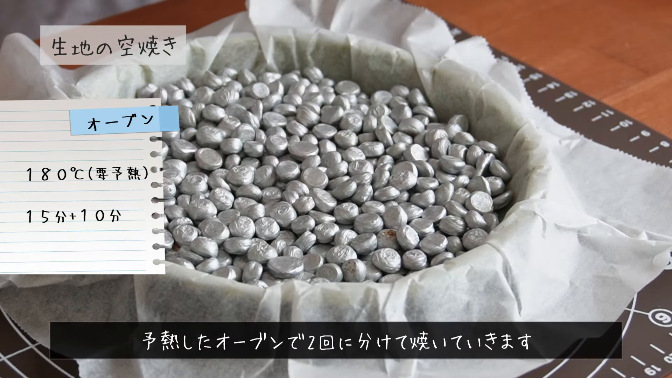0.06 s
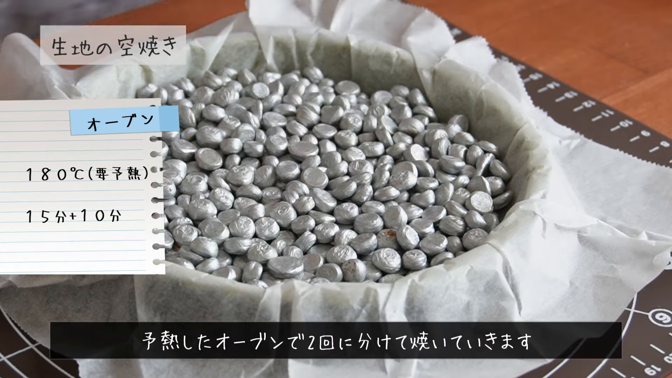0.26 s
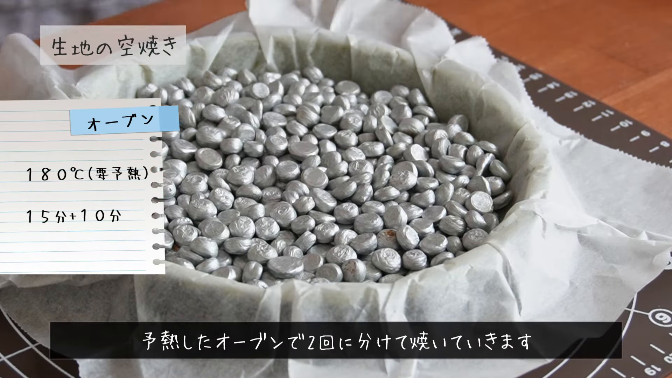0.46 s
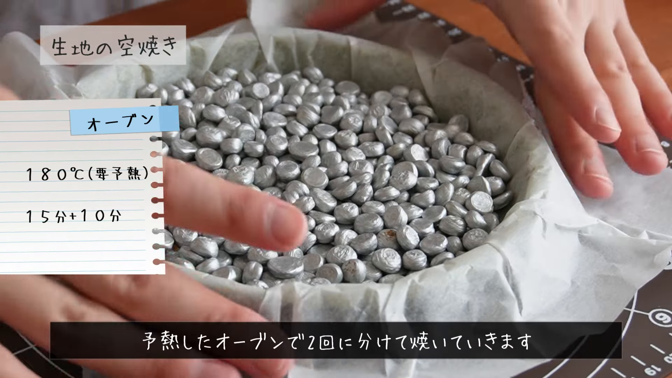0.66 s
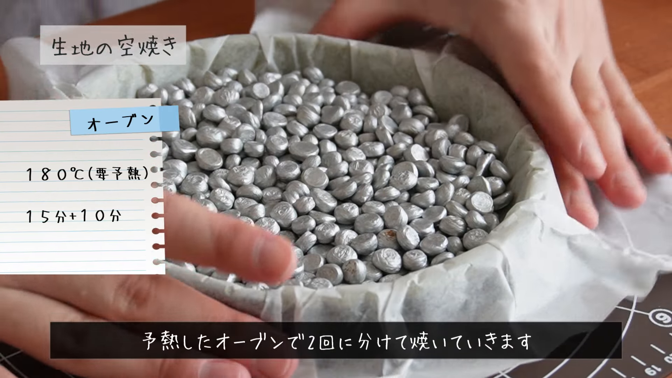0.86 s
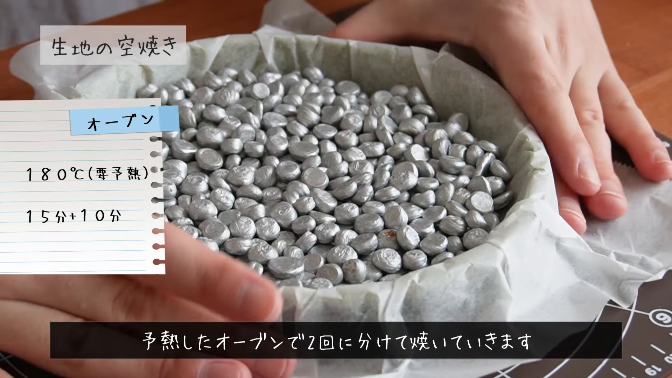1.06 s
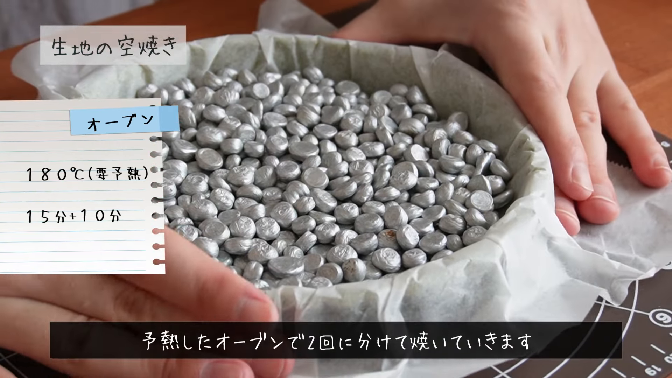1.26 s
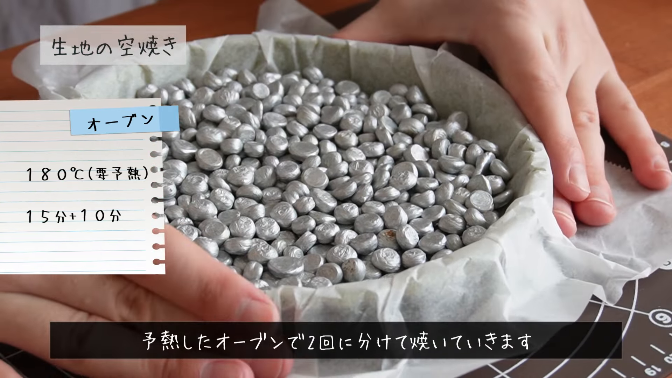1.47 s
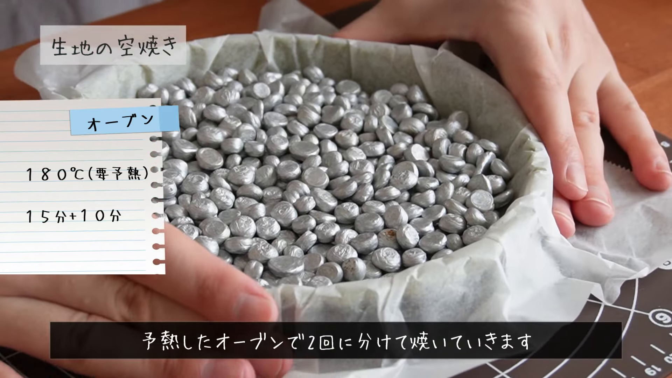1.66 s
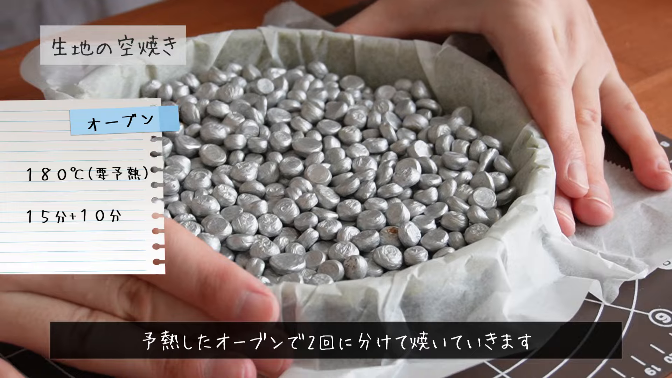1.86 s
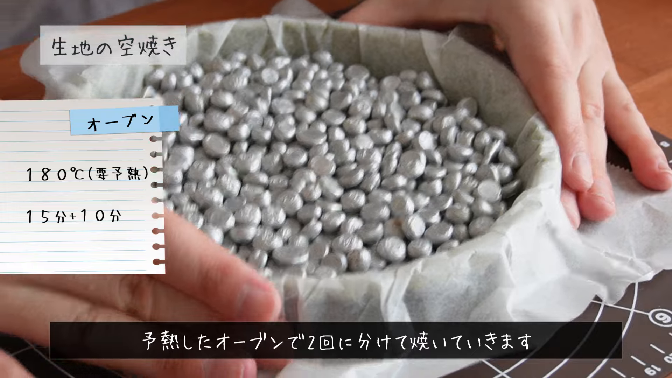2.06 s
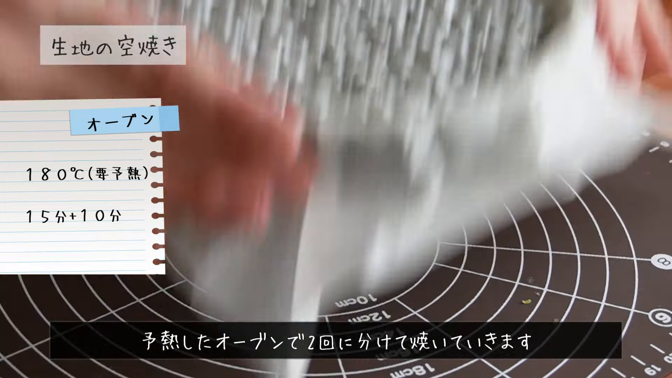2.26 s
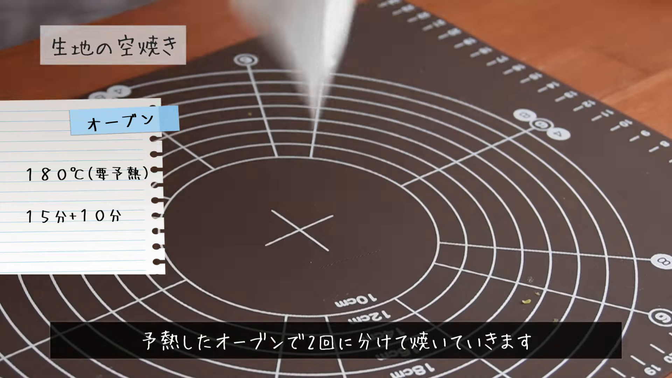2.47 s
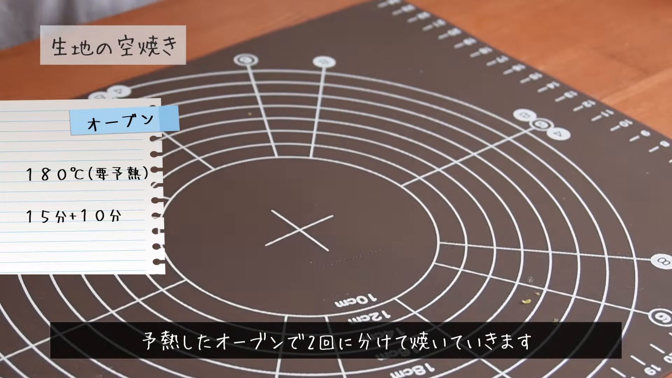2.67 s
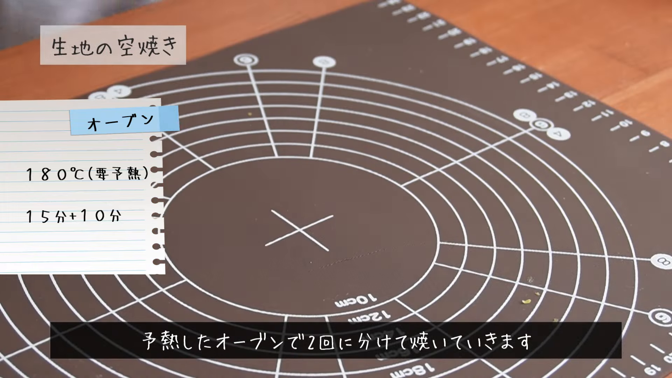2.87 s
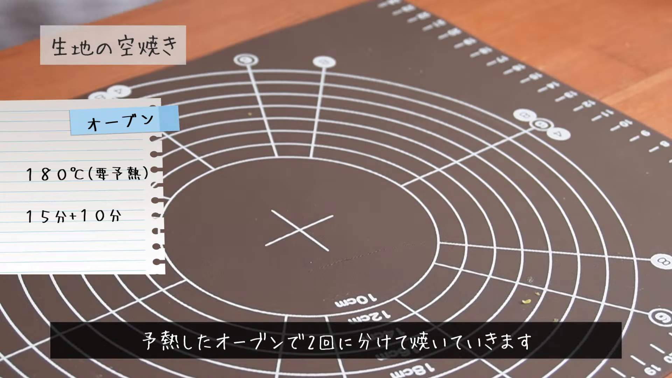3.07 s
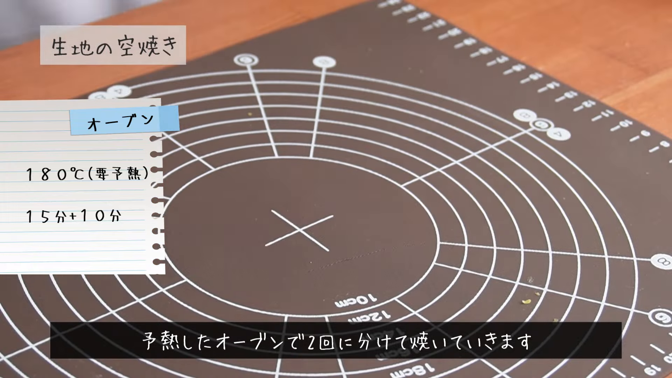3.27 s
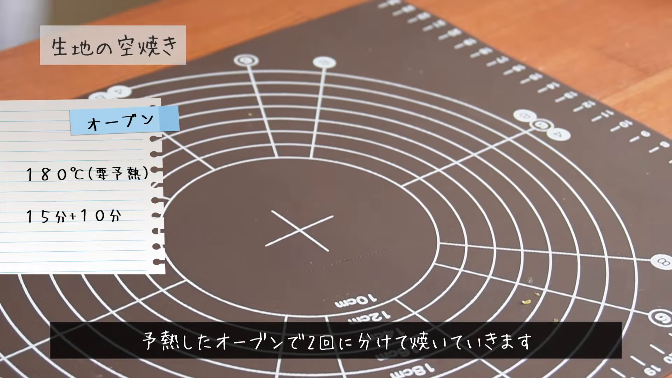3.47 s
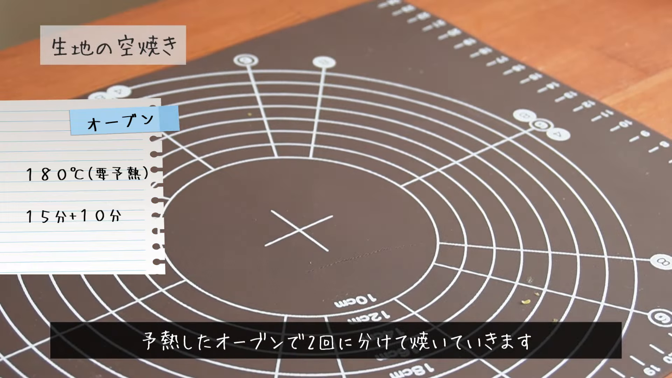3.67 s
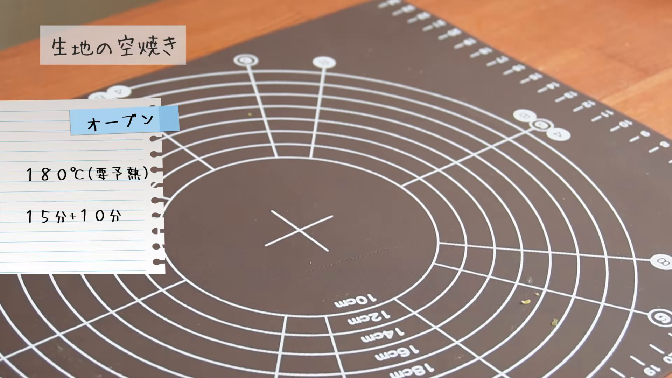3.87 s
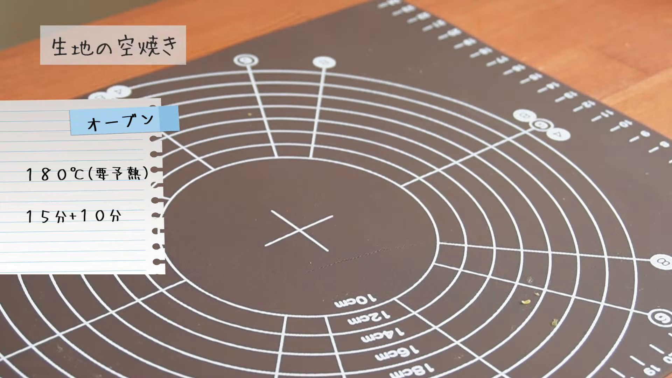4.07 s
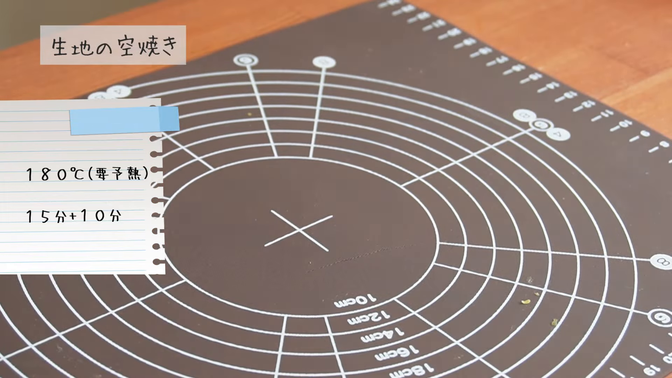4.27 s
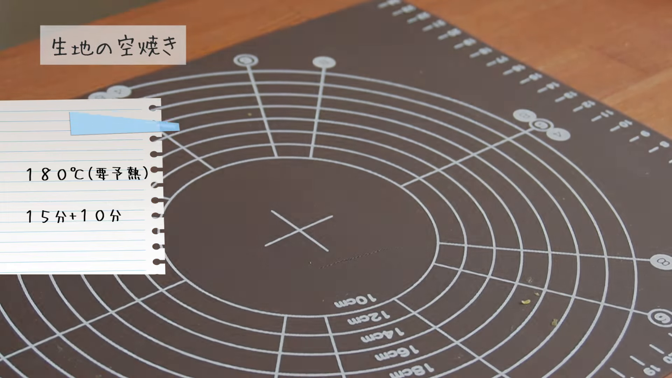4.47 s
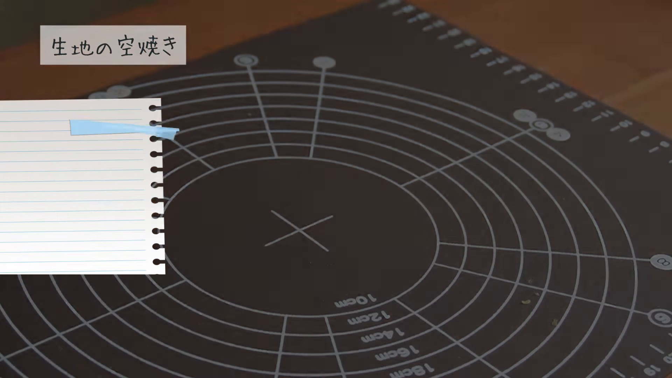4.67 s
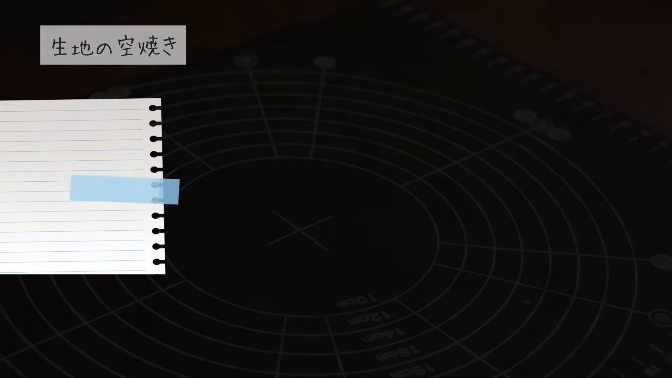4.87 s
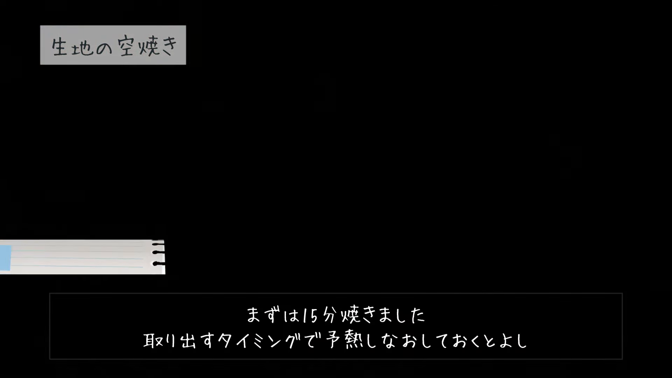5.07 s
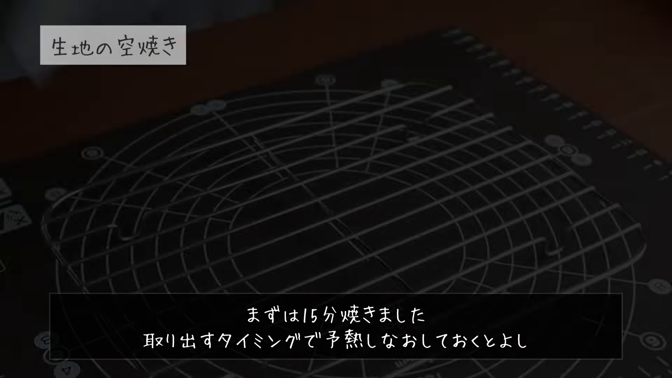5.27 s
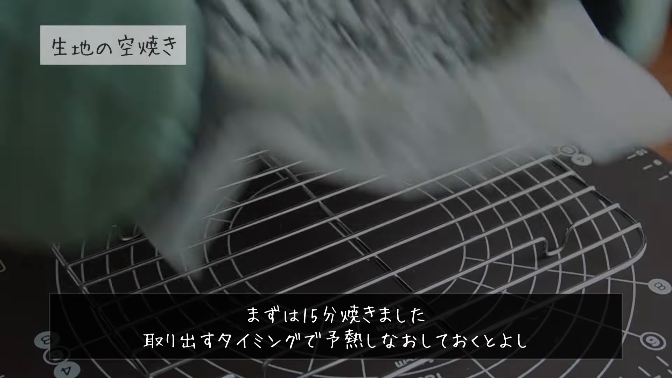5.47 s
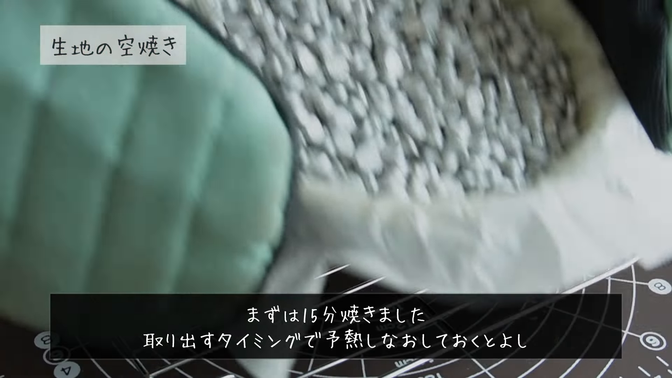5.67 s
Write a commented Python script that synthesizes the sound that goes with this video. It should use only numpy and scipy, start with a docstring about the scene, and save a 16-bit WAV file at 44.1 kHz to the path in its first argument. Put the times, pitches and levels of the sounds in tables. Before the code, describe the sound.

A close microphone catches dry paper snaps and grainy rustle over faint room hiss. The handling is busiest early, eases, then swells with short metallic tin knocks at lifting. A soft floor thud, brushing sleeves and scattered crackles move away into the small room. Near the end a low surging fan drone switches in with a few fresh paper ticks.

```python
"""A quiet kitchen, close by: hands lift a paper-lined tart tin of small metal weights and carry it off.
Behind them lie noise-band room tone, soft thudding floorboard modes and dull noise sweeps of sleeves.
Stiff baking paper snaps in short ringing noise bursts over grainy rustle; skin rubs it in narrow noise.
The tin knocks as struck modes, and the near sounds get dense reflections from the room.
At the end the tin comes back from the oven while a fan drones: surging noise, casing tones and a motor sine."""
import sys
import numpy as np
from scipy import signal
from scipy.io import wavfile

SR = 44100
rng = np.random.default_rng(int(sys.argv[2]) if len(sys.argv) > 2 else 0)


def file_out(sig):
    """Save sig as 16-bit WAV at sys.argv[1]."""
    # one column per channel
    cols = np.atleast_2d(sig).T
    # limit, then scale
    lim = np.clip(cols, -1, 1)
    pcm = np.round(lim * 32767).astype(np.int16)
    wavfile.write(sys.argv[1], SR, pcm)


N = 252248

CARRIED_OFF_S, BACK_S = 3.2, 4.6   # the tin moves away from the microphone between these times


def from_db(db):
    """Decibels to an amplitude factor."""
    return 10 ** (np.asarray(db) / 20)


def rms_one(x):
    """Scale to an rms of 1."""
    return x / np.sqrt(np.mean(x ** 2) + 1e-20)


def in_time(rows, outside=None):
    """Levels joined by straight lines; a given value holds before and after."""
    s, level_db = np.transpose(rows)
    return np.interp(np.arange(N) / SR, s, level_db, outside, outside)


def at_hz(points, hz):
    """Read a curve along a logarithmic frequency axis."""
    curve_hz, value = np.transpose(points)
    return np.interp(np.log(hz), np.log(curve_hz), value)


def butter(x, order, hz, kind):
    """Butterworth filter: "low", "high" or "band"."""
    return signal.sosfilt(signal.butter(order, hz, kind, fs=SR, output="sos"), x)


def band(x, low_hz, high_hz):
    """Keep the sound between two frequencies."""
    return butter(x, 2, [low_hz, min(high_hz, .45 * SR)], "band")


def coloured(spectrum, whites):
    """Half-octave bands at their own levels, neighbours on unrelated sources; rms 1."""
    edges = 25 * 2 ** np.arange(0, 9.6, .5)
    out = 0
    for k, (low, high) in enumerate(zip(edges, edges[1:])):
        gain = from_db(at_hz(spectrum, np.sqrt(low * high)))
        out = out + gain * band(whites[k % 2], low, high)
    return rms_one(out)


def resonance(x, hz, width_hz):
    """A two-pole resonance with gain 1 on top."""
    r = np.exp(-np.pi * width_hz / SR)
    poles = [1, -2 * r * np.cos(2 * np.pi * hz / SR), r * r]
    return signal.lfilter([(1 - r * r) / 2, 0, (r * r - 1) / 2], poles, x)


def lumps(per_s):
    """Slow random wander, spread 1: white noise through two equal low-pass poles."""
    r = np.exp(-2 * np.pi * per_s / SR)
    return rms_one(signal.lfilter([1], [1, -2 * r, r * r], rng.standard_normal(N)))


def struck(blows, modes):
    """Every blow sets all modes of the body ringing as decaying sines."""
    clicks, out = np.full(N, 1e-18), 0
    for s, db in blows:
        clicks[round(s * SR)] = from_db(db)
    for hz, level_db, t60 in modes:
        r, w = from_db(-60 / (t60 * SR)), 2 * np.pi * hz / SR
        out = out + signal.lfilter([0, from_db(level_db) * np.sin(w)], [1, -2 * r * np.cos(w), r * r], clicks)
    return out


# room tone, sinking unevenly and stepping up as the fan comes in: (time [s], hiss level [dB])
AIR = [(0, -71.5), (.3, -67.5), (.6, -69.5), (1.4, -76.5), (2.3, -74.5), (3.0, -78.5), (3.7, -72),
       (4.5, -80.5), (5.04, -80.5), (5.07, -74), (5.72, -73)]
# colours of the rumble, the hiss and the fine hiss: (frequency [Hz], relative density [dB per Hz])
RUMBLE_COLOUR = [(15, -38), (25, -7), (69, 2), (119, -8.5), (275, -9), (350, -13.5), (900, -10.5),
                 (1170, -34.5), (1980, -120)]
HISS_COLOUR = [(350, -40.5), (600, -16.5), (837, -5), (1650, 0), (3080, -4.5), (8250, -15), (15200, -33),
               (16500, -40.5)]
FINE_HISS_COLOUR = [(1000, -19), (3000, -0.5), (8500, -4.5), (10500, -8.5), (16500, -0.5)]


def room_tone(rumble_db=-73, rumble_follows=.6, fine_db=-86.5, fine_follows=.6):
    """Steady noise of the kitchen: rumble and fine hiss follow a share of the swing of the main hiss."""
    hiss_db = in_time(AIR)
    swing_db = hiss_db - hiss_db.mean()
    white = rng.standard_normal((6, N))
    rumble = from_db(rumble_db + rumble_follows * swing_db) * coloured(RUMBLE_COLOUR, white[:2])
    hiss = from_db(hiss_db) * coloured(HISS_COLOUR, white[2:4])
    fine_hiss = from_db(fine_db + fine_follows * swing_db) * coloured(FINE_HISS_COLOUR, white[4:])
    return rumble + hiss + fine_hiss


# colour of the fan's air: (frequency [Hz], relative density [dB per Hz])
FAN_COLOUR = [(18, -44.5), (30, -8), (53, -6), (113, -8.5), (169, -10.5), (439, -9.5), (706, -15.5),
              (1360, -17.5), (12000, -46), (15600, -72), (22000, -120)]
# casing resonances: (frequency [Hz], width of each of two passes [Hz], level against the air [dB])
FAN_TONES = [(466, 110, -1.5), (1316, 60, -31)]


def fan(start_s=5.064, rise_s=.0041, level_db=-60.5, swell_db_per_s=8, surge_db=2.5,
        motor_hz=115.6, motor_db=0):
    """Surging air noise with a wavering motor drone and noise ringing in the casing."""
    t = np.arange(N) / SR
    white = rng.standard_normal((3, N))
    air = coloured(FAN_COLOUR, white) * from_db(surge_db * lumps(per_s=34.0))
    tones = from_db(motor_db + 2.0 * lumps(per_s=11.0)) * np.sin(2 * np.pi * motor_hz * t)
    for hz, width_hz, db in FAN_TONES:
        casing = resonance(resonance(white[2], hz, width_hz), hz, width_hz)
        tones += from_db(db) * rms_one(casing)
    on_s = t - start_s
    gain = from_db(level_db + swell_db_per_s * on_s) * np.clip(on_s / rise_s, 0, 1)
    return gain * rms_one(air + tones)


# how long the kitchen rings: (frequency [Hz], decay by 60 dB [s])
KITCHEN = [(500, 0.15), (1500, 0.26), (4000, 0.15), (9000, 0.19), (15000, 0.11)]


def kitchen(x, level_db=-8, onset_s=.0017):
    """Dense reflections: the power of each narrow band builds up, dies away and is carried by noise."""
    out, white = 0, rng.standard_normal((2, N))
    edges = 300 * 2 ** np.arange(0, 6, .25)   # quarter octaves [Hz]
    build = np.exp(-1 / (onset_s * SR))
    for k, (low, high) in enumerate(zip(edges, edges[1:])):
        t60 = at_hz(KITCHEN, np.sqrt(low * high))
        die = from_db(-120 / (t60 * SR))   # power falls by a factor of a million in t60
        smoothing = np.convolve([1, -die], [1, -build])
        power = signal.lfilter([(1 - die) * (1 - build)], smoothing, band(x, low, high) ** 2 + 1e-18)
        out = out + np.sqrt(np.abs(power)) * rms_one(band(white[k % 2], low, high))
    return from_db(level_db) * out


# footfalls: (time [s], blow level [dB])
STEPS = [(3.222, -56.5), (3.31, -65.5), (3.56, -72)]
# modes of the floorboards: (frequency [Hz], level [dB], decay by 60 dB [s])
FLOORBOARDS = [(43.7, 10, 0.48), (83.1, 6, 0.11), (188, 11, 0.039), (272, 9.5, 0.055)]


def steps(sole_roll_s=.04):
    """A soft sole rolls onto the floor: an uneven push on the boards, not a single tap."""
    t = np.arange(round(.2 * SR)) / SR
    roll = np.exp(-t / sole_roll_s) * rng.standard_normal(len(t))
    roll /= np.sqrt(np.sum(roll ** 2))
    pushed = signal.fftconvolve(struck(STEPS, FLOORBOARDS), roll)[:N]
    return band(pushed, 35, 320)


# dull sweeps of sleeves and loose paper: (time [s], hold [s], low level [dB], upper level [dB])
BRUSH = [(0.648, 0.0074, -62.5, -56.5), (.872, 0.015, -69.5, -55), (1.066, .05, -66.5, -72),
         (2.12, 0.043, -70.5, -63), (2.33, 0.24, -59.5, -75.5), (3.296, .05, -66.5, -80.5),
         (3.483, .06, -59.5, -60.5), (3.765, 0.013, -68.5, -70), (4.26, .01, -71.5, -66.5),
         (4.387, .01, -69, -64.5), (5.5, .05, -56, -71.5)]


def sweeps(column, rise_db_per_s=135, fall_db_per_s=115):
    """Gain of one level column: each sweep of the arms rises, holds and dies away."""
    t, gain = np.arange(N) / SR, 0
    for row in BRUSH:
        before_s = np.maximum(row[0] - t, 0)
        after_s = np.maximum(t - row[0] - row[1], 0)
        gain = gain + from_db(row[column] - rise_db_per_s * before_s - fall_db_per_s * after_s)
    return gain


def brush(low_hz=283, split_hz=640, high_hz=1510, lumpy_db=1.5):
    """Soft, lumpy, dull noise in two bands while the arms move."""
    white = rng.standard_normal((2, N)) * from_db(lumpy_db * lumps(per_s=23.0))
    low = rms_one(band(white[0], low_hz, split_hz))
    upper = rms_one(band(white[1], split_hz, high_hz))
    return low * sweeps(column=2) + upper * sweeps(column=3)


# tin leaving the mat: (time [s], blow level [dB])
KNOCKS = [(2.2, -39.5), (2.216, -33), (2.237, -36), (2.252, -41)]
# modes of the tin: (frequency [Hz], level [dB], decay by 60 dB [s])
TIN = [(650, -33, 0.13), (752, 0, 0.082), (823, -5.5, 0.041)]


def tin_knocks():
    """The knocked tin rings in a few short modes."""
    return butter(struck(KNOCKS, TIN), 2, 400, "high")


# fingers rubbing the paper: (time [s], level [dB])
RUB = [(0.555, -96), (0.573, -62.5), (0.633, -40.5), (0.72, -93)]


def rub(squeak_hz=2030, width_hz=120.0, rasp_db=-8, rasp_low_hz=2800, rasp_high_hz=4000):
    """Stick-slip of skin on paper: narrow noise around one pitch, broken up, with a rasp above it."""
    r = np.exp(-np.pi * width_hz / SR)
    wobble = signal.lfilter([1], [1, -2 * r, r * r], rng.standard_normal((2, N)))
    turn = 2 * np.pi * squeak_hz * np.arange(N) / SR
    squeak = rms_one(wobble[0] * np.cos(turn) + wobble[1] * np.sin(turn))
    rasp = rms_one(band(rng.standard_normal(N), rasp_low_hz, rasp_high_hz))
    broken_db = 3.5 * lumps(per_s=59.0)
    return from_db(in_time(RUB, -200) + broken_db) * (squeak + from_db(rasp_db) * rasp)


# paper and weights shifting under the hands, one curve per handling: (time [s], level [dB])
RUSTLE = [
    [(.55, -70.5), (.64, -54.5), (.74, -63), (.87, -48), (.91, -35.5), (.985, -37), (1.01, -63.5),
     (1.1, -51), (1.23, -71), (1.42, -85.5)],
    [(2.02, -103), (2.126, -61), (2.248, -55), (2.426, -78), (2.634, -72), (2.7, -89)],
    [(3.38, -85.5), (3.48, -57.5), (3.7, -92.5)],
    [(4.18, -103), (4.274, -59.5), (4.5, -81.5)],
    [(5.36, -68.5), (5.538, -75), (5.72, -71.5)],
]
# colour of the rustle: (frequency [Hz], relative density [dB per Hz])
RUSTLE_COLOUR = [(150, -58), (250, -6.5), (1190, 2), (3180, 14), (3590, 5), (6990, 7), (8480, -18.5),
                 (10100, -23), (13600, -2), (16500, -18.5)]


def handling():
    """Gain of all handlings together; practically silence between them."""
    return sum(from_db(in_time(rows, -200)) for rows in RUSTLE)


def rustle(per_s=1200.0, spread_db=4.5, grain_s=.0006):
    """Countless tiny creases and weights touching: random grains of decaying noise."""
    touching = rng.random(N) < per_s / SR
    sizes = from_db(spread_db * np.minimum(rng.exponential(1, N), 4)) * touching
    shape = np.sqrt(signal.lfilter([1], [1, -np.exp(-1 / (grain_s * SR))], sizes ** 2))
    return handling() * coloured(RUSTLE_COLOUR, shape * rng.standard_normal((2, N)))


def crackles(per_s=130, above_rustle_db=10.5, spread_db=3, low_hz=1500, high_hz=8500):
    """Creases give way at random, louder where the handling is stronger; same columns as SNAPS."""
    draw = rng.random((round(per_s * N / SR), 4))
    s = draw[:, 0] * (N - 1) / SR
    effort_db = 20 * np.log10(handling()[(s * SR).astype(int)])
    peak_db = effort_db + above_rustle_db - spread_db * np.log(1 - .98 * draw[:, 1])
    hz = low_hz * (high_hz / low_hz) ** draw[:, 2]
    bright_db = 16 * (draw[:, 3] - .5)
    return np.transpose([s, peak_db, hz, bright_db])


# single creases, loud and faint: (time [s], peak level of the middle part [dB], ring [Hz], brightness [dB])
SNAPS = [(0.601, -50, 2020, 4), (0.6576, -26.5, 1930, -5), (0.6635, -21.5, 6300, 3),
         (0.6742, -26.5, 4970, -7), (0.746, -40, 2820, 0), (0.759, -35.5, 2700, -9),
         (0.7801, -28.5, 2240, -7), (0.7891, -23.5, 3640, 8), (0.799, -20.5, 4160, 2.5),
         (0.8059, -19.5, 2820, -3.5), (0.816, -20.5, 2480, 3), (0.8389, -23.5, 2800, 5),
         (0.856, -13.5, 3346, -6), (0.9058, -24.5, 1211, -3.5), (0.9145, -22.5, 8700, 2),
         (0.9314, -16, 7500, 6), (0.9421, -23, 2600, 7), (0.951, -25, 3730, -9), (0.9648, -16.5, 9300, 6),
         (0.9784, -30, 2200, -4), (0.985, -20.5, 1350, 4), (1.0117, -28, 3910, 10), (1.0206, -25, 4790, 5),
         (1.043, -17, 5670, 4), (1.0485, -21.5, 6680, 3), (1.0563, -17, 8900, 2.5), (1.0774, -28, 7670, 5),
         (1.0825, -23.5, 2800, -1), (1.1158, -20, 4920, 2), (1.1387, -34.5, 2040, 6),
         (1.1578, -30.5, 5040, 10), (1.2053, -44, 2900, 8), (1.236, -30.5, 3000, 8),
         (1.2521, -22.5, 1450, -0.5), (1.316, -22, 3230, 5.5), (1.3338, -31, 8300, 4),
         (1.3967, -44, 4850, 2), (1.5264, -53, 1040, -1.5), (1.5927, -32.5, 5040, -5.5),
         (1.6598, -46.5, 4130, -2), (1.711, -40, 2230, -5), (1.7491, -23, 5260, 8),
         (1.8028, -33.5, 3500, 4), (1.8202, -32, 8560, -2), (1.9179, -26.5, 8960, 9.5),
         (1.9284, -28, 9000, -1), (1.9364, -29, 2010, 10), (1.965, -40, 1360, -9.5),
         (1.9924, -39.5, 2600, 6), (2.0187, -37.5, 9700, 8.5), (2.0684, -49, 2570, -1),
         (2.0782, -36, 945, 2.5), (2.101, -40.5, 1610, -15.5), (2.1185, -31.5, 2540, -7),
         (2.1426, -25.5, 8200, -2.5), (2.17, -25.5, 1800, 1), (2.1872, -28, 1240, -8),
         (2.2012, -32, 1550, -11), (2.2154, -19, 840, 9), (2.2365, -15, 3190, -2),
         (2.253, -22.5, 3900, -8.5), (2.2857, -31, 3180, 0), (2.2943, -33, 4100, -8),
         (2.3191, -40.5, 4950, 8), (2.4329, -33, 5530, 3), (2.5155, -30, 5600, 4),
         (2.5452, -28, 1520, -2.5), (2.5489, -22.5, 5230, -8), (2.5688, -24, 1870, -5.5),
         (2.5887, -19.5, 8850, 1), (2.8479, -30, 8000, -3.5), (2.8542, -30.5, 3510, -4),
         (2.8858, -47, 2800, -3), (2.8976, -42, 3020, -12), (2.9924, -51.5, 1020, -4),
         (3.026, -29.5, 5100, 8), (3.3032, -12.5, 5250, 3.5), (3.3084, -30.5, 5150, -1),
         (3.3158, -24.5, 8700, -7.5), (3.4604, -33.5, 999, -4), (3.475, -17, 4980, 2.5),
         (3.5444, -28, 4640, 5), (3.5775, -23.5, 6520, -0.5), (3.5834, -26, 3470, -10.5),
         (3.69, -59, 1010, 0), (3.7467, -35.5, 4830, -7), (3.7862, -27.5, 4380, 1), (3.8928, -34, 4220, 6),
         (4.0023, -34.5, 5860, 9), (4.119, -54.5, 2090, 3), (4.1515, -64, 1650, 6),
         (4.1957, -40.5, 5120, -9), (4.261, -29, 6010, 0.5), (4.2722, -31.5, 1070, 2),
         (4.2945, -44, 3130, -12), (4.3433, -25, 7800, 18.5), (4.36, -27.5, 5100, -1.5),
         (4.3868, -27, 2340, -6), (4.5815, -59, 3620, 6.5), (4.5997, -35.5, 3720, -8),
         (4.6111, -33, 2090, -2), (4.694, -30.5, 4440, -1), (4.7434, -51.5, 3990, -2),
         (4.7775, -50.5, 1000, -3.5), (5.1364, -31.5, 8590, 4.5), (5.2166, -42.5, 1720, -13),
         (5.301, -46.5, 1350, -5), (5.4241, -21, 7600, 2.5), (5.4759, -21.5, 8140, 2),
         (5.488, -28, 4130, -6.5), (5.5056, -23.5, 4850, -8), (5.5835, -24.5, 8350, 4)]
# dull and thin top parts against the middle, for a 4 kHz ring; larger, lower facets sound duller
LOW_PART_DB, LOW_DB_PER_OCTAVE = -13, -2.5
TOP_PART_DB, TOP_DB_PER_OCTAVE, TOP_SHARE = -10.5, 3.5, .68   # the share of brightness lifts the top
TOP_LOSS_DB_PER_S = 7   # the top fades while the tin moves away
BODY_DB = -16   # the tin answers each snap with a short dull body, below the low part


def facet_ring(burst, hz, other_hz, sharpness=10.2, ring_db=-3.0, other_db=-3.0):
    """A noise burst also rings at the pitch of its paper facet and of a neighbouring one."""
    ring = rms_one(resonance(burst, hz, hz / sharpness))
    other = rms_one(resonance(burst, other_hz, other_hz / sharpness))
    return rms_one(burst) + from_db(ring_db) * ring + from_db(other_db) * other


def snaps(rows, t60=.008, low_t60=.016, t60_spread=.25, rise_s=.0005):
    """A crease buckles: a few ms of noise, ringing at the pitch of that paper facet; lows last longer."""
    size = 2048
    out, t = np.zeros(N + size), np.arange(size) / SR
    for (s, peak_db, hz, bright_db), white in zip(rows, rng.standard_normal((len(rows), size))):
        if peak_db < -70:   # too faint to play
            continue
        octaves = np.log2(hz / 4000)
        low_db = LOW_PART_DB + LOW_DB_PER_OCTAVE * octaves - bright_db
        away_s = max(s - CARRIED_OFF_S, 0) * (s < BACK_S)
        top_db = TOP_PART_DB + TOP_DB_PER_OCTAVE * octaves + TOP_SHARE * bright_db
        top_db -= TOP_LOSS_DB_PER_S * away_s

        # the last two noise samples also serve as chance for pitch and length
        other_hz = np.clip(hz * 2 ** white[-2], 700, 12000)
        fade_db = -60 * t / np.exp(t60_spread * white[-1])
        rise = 1 - np.exp(-t / rise_s)
        short = facet_ring(white * from_db(fade_db / t60) * rise, hz, other_hz)
        long = facet_ring(white * from_db(fade_db / low_t60) * rise, hz, other_hz)

        # the middle part spans a range around the ring pitch
        span_hz = np.clip([.39 * hz, 2.6 * hz], [1800, 4500], [4000, 9500])
        parts = (band(short, *span_hz), band(band(long, 800, 2200), 500, 4000),
                 band(short, 9500, 15000), band(long, 250, 800))
        middle, low, top, body = [x / np.abs(x).max() for x in parts]
        dull = from_db(low_db) * (low + from_db(BODY_DB) * body)
        out[round(s * SR):][:size] += from_db(peak_db) * (middle + dull + from_db(top_db) * top)
    return out[:N]


def scene(room_gain_db_per_s=1):
    """Near sounds with their reflections over the room tone, the fan, the steps and the sleeves."""
    background = room_tone() + fan() + steps() + brush()
    near = tin_knocks() + rub() + rustle() + snaps(crackles()) + snaps(SNAPS)
    # the room grows against the direct sound while the tin is carried off
    t = np.arange(N) / SR
    away_s = np.maximum(t - CARRIED_OFF_S, 0) * (t < BACK_S)
    reflections = kitchen(from_db(room_gain_db_per_s * away_s) * near)
    return (background + near + reflections)[None]


def record(dry, port_hz=8600, port_width_hz=1200, added_db=-6, split_hz=8700, cutoff_hz=16700):
    """The microphone port lifts a narrow treble band by adding its resonance; the top is cut."""
    lifted = dry + from_db(added_db) * resonance(dry, port_hz, port_width_hz)
    # two halves rejoined at equal level: their overlap adds a further lift around the split
    above = butter(lifted, 4, split_hz, "high")
    below = butter(lifted, 4, split_hz, "low")
    return signal.sosfilt(signal.cheby2(12, 60, cutoff_hz, fs=SR, output="sos"), below + above)


dry = scene()
out = record(dry)
file_out(out)
```